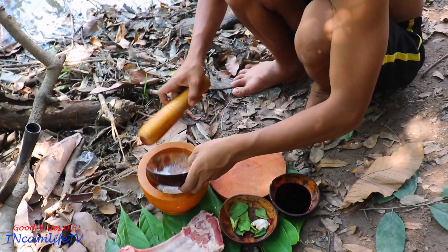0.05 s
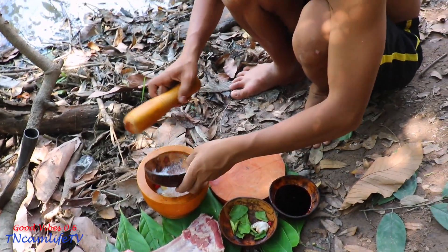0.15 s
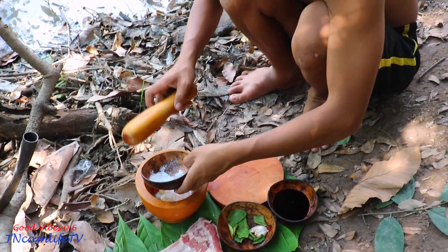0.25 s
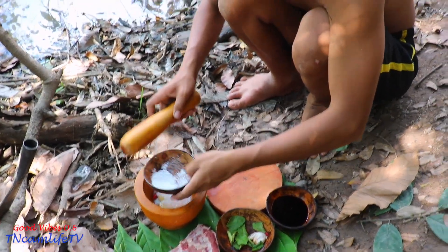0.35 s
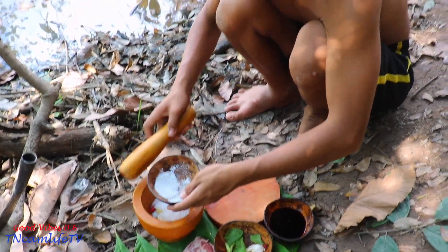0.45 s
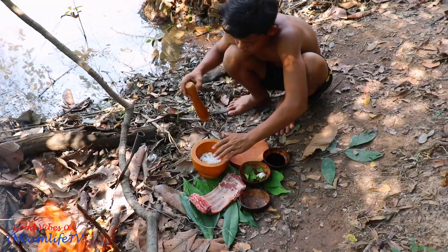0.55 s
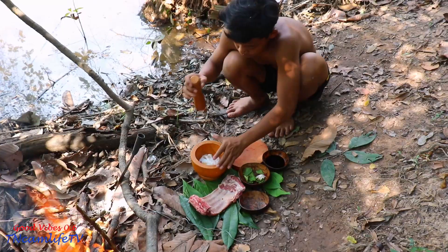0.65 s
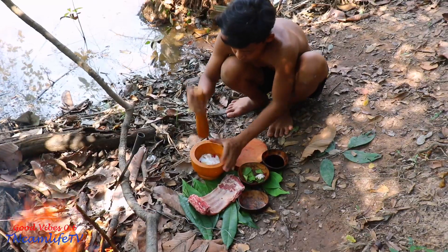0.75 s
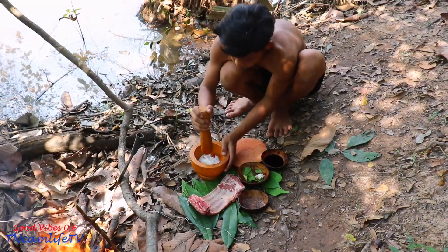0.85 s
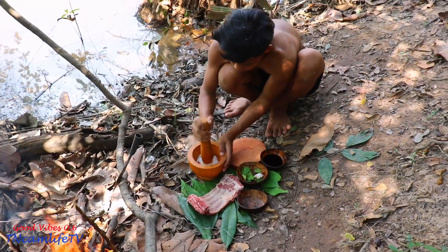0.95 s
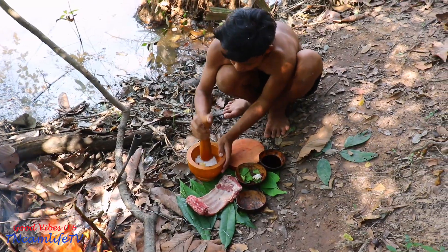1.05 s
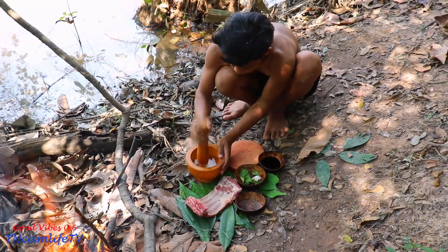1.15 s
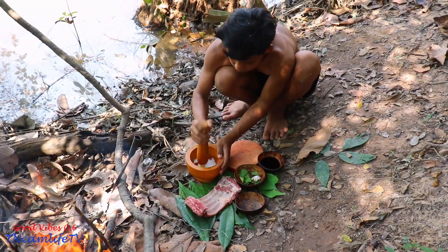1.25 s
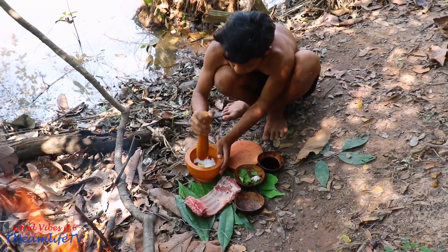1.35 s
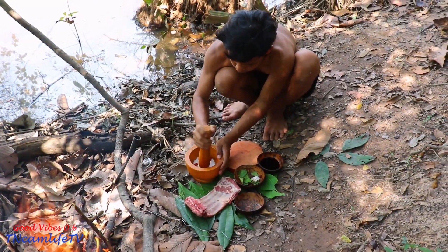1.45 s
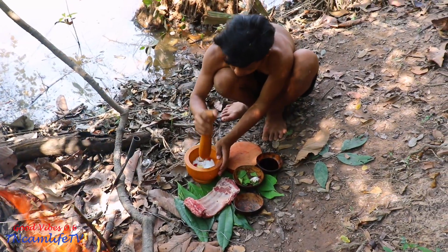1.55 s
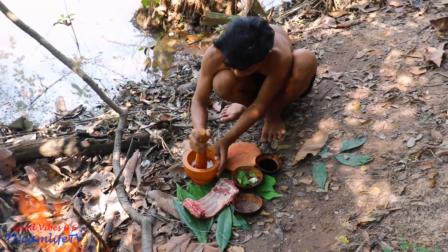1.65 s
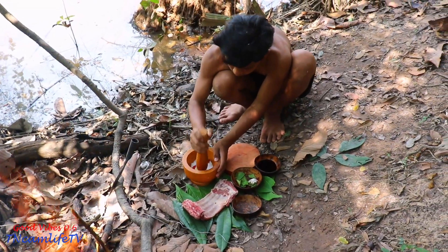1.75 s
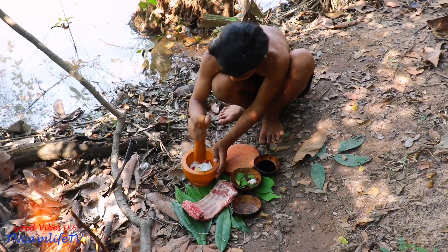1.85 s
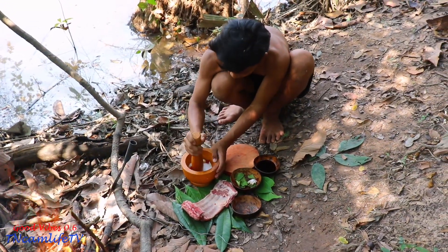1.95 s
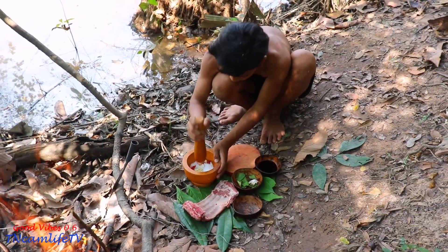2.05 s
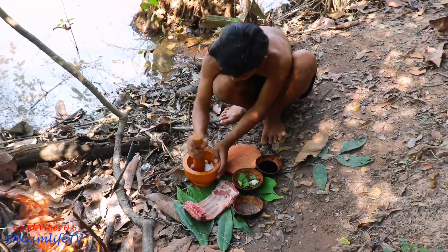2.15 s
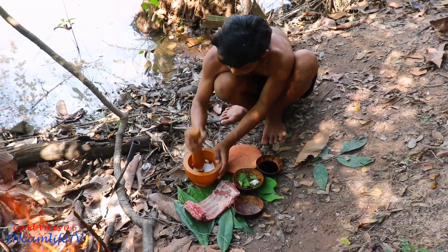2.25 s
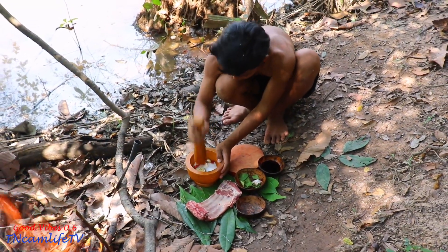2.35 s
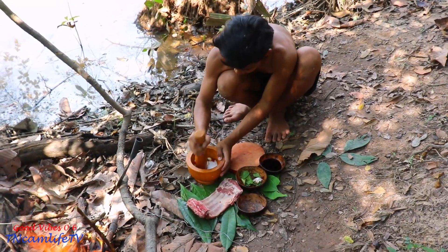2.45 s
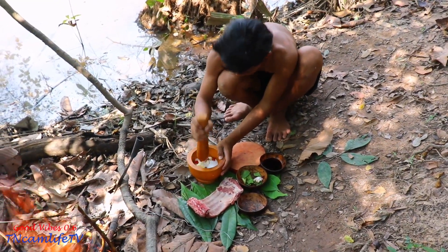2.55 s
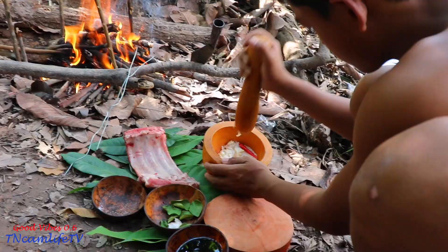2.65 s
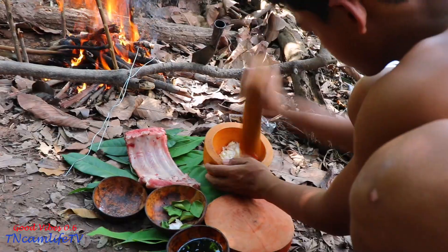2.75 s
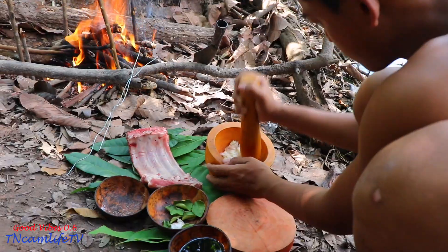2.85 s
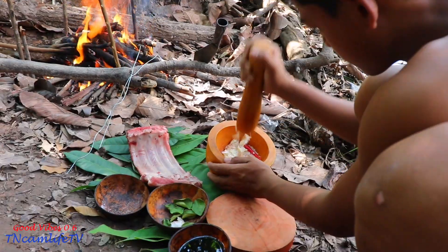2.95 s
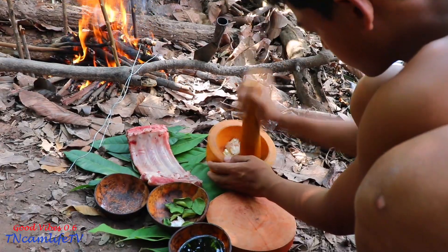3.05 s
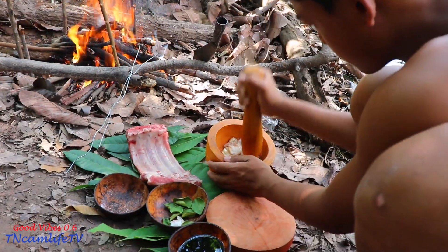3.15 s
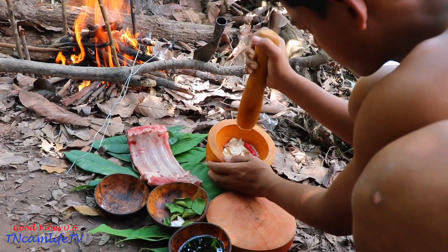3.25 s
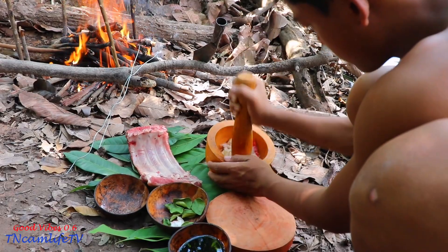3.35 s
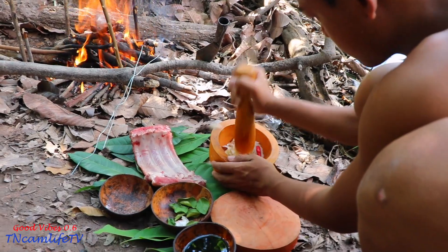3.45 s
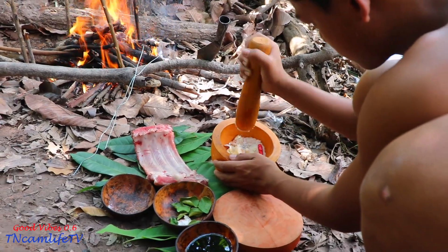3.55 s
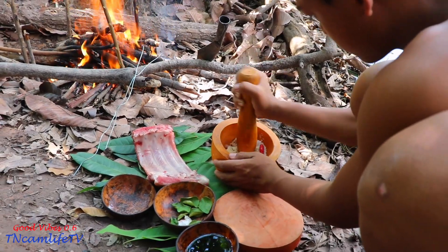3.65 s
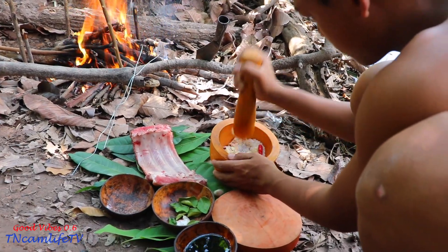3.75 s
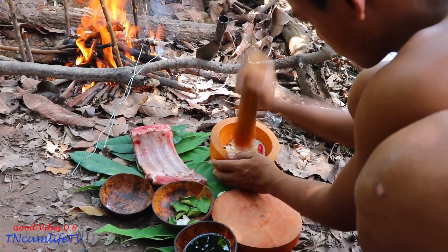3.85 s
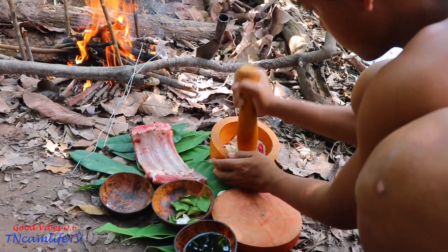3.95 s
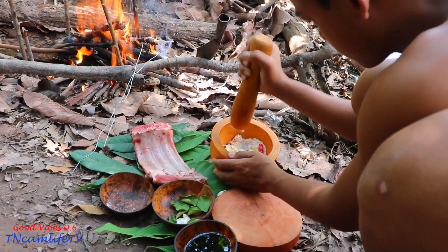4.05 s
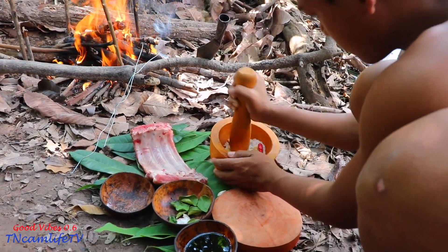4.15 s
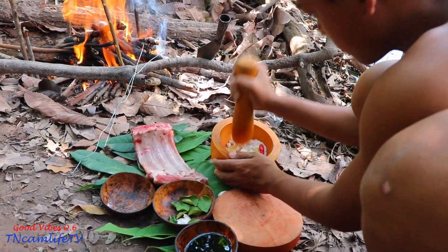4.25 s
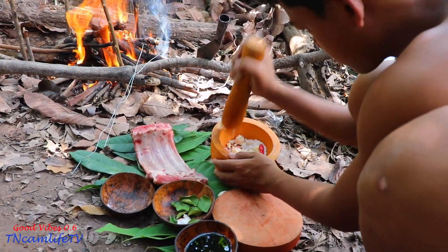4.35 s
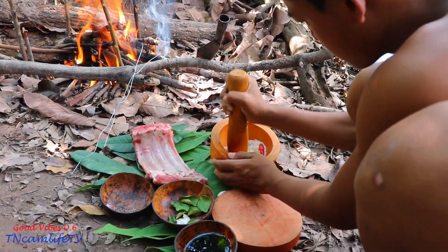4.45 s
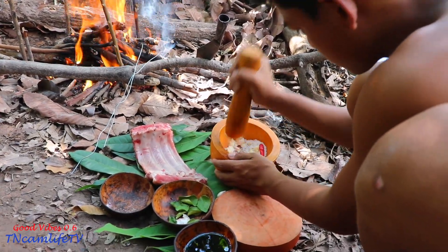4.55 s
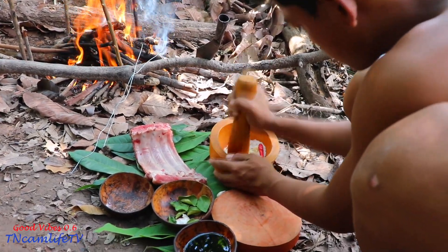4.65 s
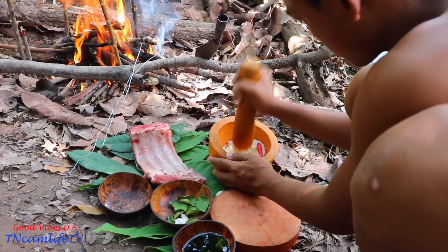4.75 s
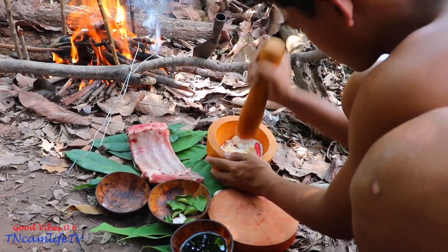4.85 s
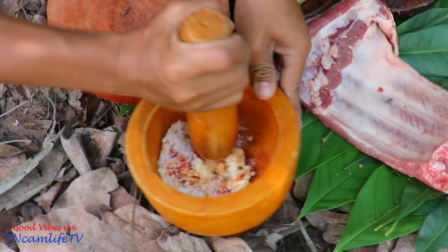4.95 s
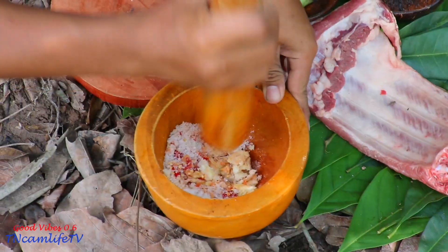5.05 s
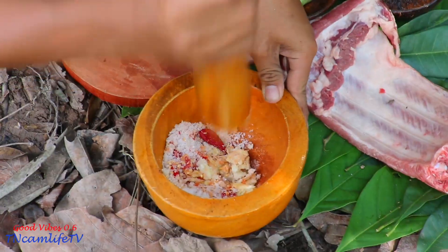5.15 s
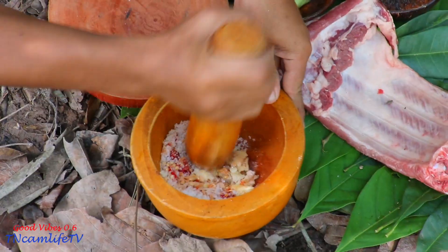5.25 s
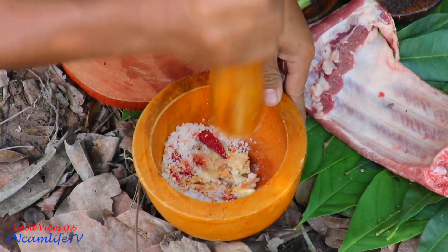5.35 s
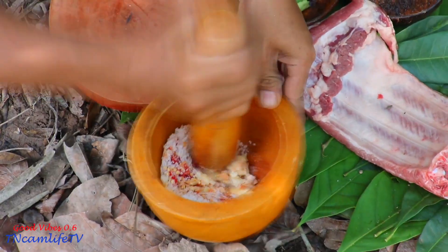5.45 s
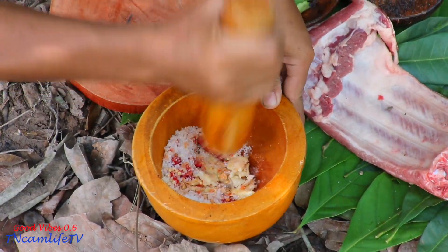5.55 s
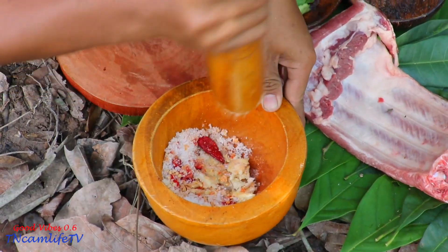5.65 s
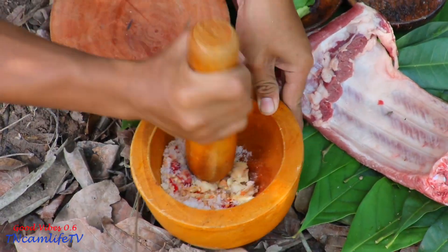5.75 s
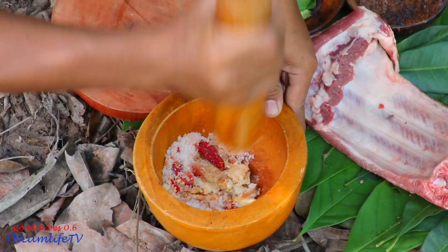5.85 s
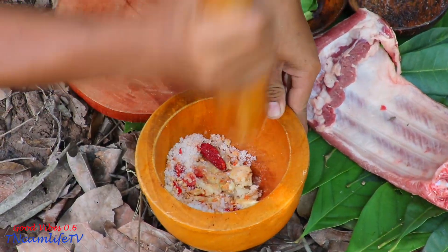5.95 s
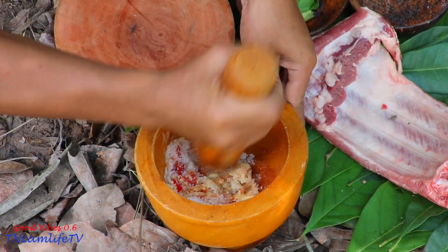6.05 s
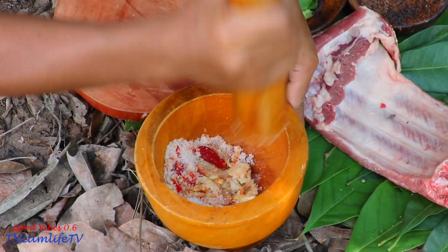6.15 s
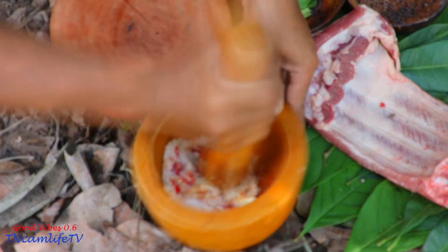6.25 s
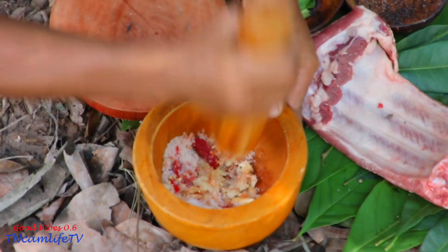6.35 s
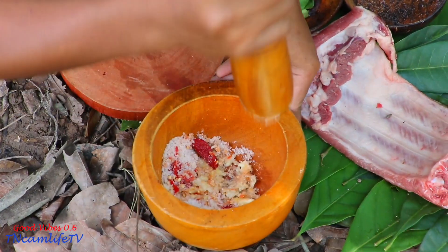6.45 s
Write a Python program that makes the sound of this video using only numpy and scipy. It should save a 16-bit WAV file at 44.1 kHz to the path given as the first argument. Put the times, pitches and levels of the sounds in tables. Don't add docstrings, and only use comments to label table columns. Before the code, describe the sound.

Dry, short knocks of wood on wood, each wrapped in a bright crunch of breaking grains, repeat at a steady hand-pounding pace. The microphone placement changes three times through tiny gaps: quiet opening, mid-distance crunching with faint high whistles, thumpier uneven pounding near a rumbling fire, then close heavy blows with paste rustling between. Open-air, almost no echo, slightly left, gain dipping after the loudest hits.

```python
import sys
import numpy as np
from scipy import signal
from scipy.io import wavfile
from scipy.ndimage import uniform_filter1d, map_coordinates

SR = 44100
rng = np.random.default_rng(int(sys.argv[2]) if len(sys.argv) > 2 else 0)


def how_loud(loudness_db):
    steps = np.asarray(loudness_db, float) / 20
    return 10 ** steps


def wrap_up_sound(samples):
    columns = np.atleast_2d(samples).T
    tamed = np.clip(columns, -1, 1)
    steps = np.round(tamed * 32767).astype(np.int16)
    wavfile.write(sys.argv[1], SR, steps)


N = 286621
LEAD_IN = 1800


def unit(x):
    return x / np.sqrt(np.mean(x ** 2) + 1e-20)


def at_hz(points, hz):
    points = np.array(points)
    return np.interp(np.log(hz), np.log(points[:, 0]), points[:, 1])


def drift(rate):
    knots = rng.standard_normal(int(7 * rate) + 9)
    return map_coordinates(knots, [np.arange(N) / SR * rate + 2], order=3)


def ring(x, hz, t60):
    r = how_loud(-60 / (t60 * SR))
    w = 2 * np.pi * hz / SR
    return signal.lfilter([0, np.sin(w)], [1, -2 * r * np.cos(w), r * r], x)


def band(x, low_hz, high_hz):
    edges = [low_hz, min(high_hz, .45 * SR)]
    return signal.sosfilt(signal.butter(2, edges, "band", fs=SR, output="sos"), x)


def add(out, sound, at, pan_db):
    part = (sound * how_loud(np.array([[pan_db / 2], [-pan_db / 2]])))[:, :N - at]
    out[:, at:at + part.shape[1]] += part


def shot_at(t):
    # (start [s], bowl pitch [Hz], ground thud [dB], fire rumble [dB], crush treble [dB])
    placements = [
        (0, 1077, -57, -54.5, -0.5),
        (.525, 903, -36, -57, -3.5),
        (2.658, 900, -30.5, -53, -2),
        (4.92, 918, -53, -54.5, -5),
    ]
    rows = np.array(placements)
    return rows[np.searchsorted(rows[1:, 0], t), 1:].T


def airy(spectrum, patchy_db):
    # (frequency [Hz], left-right likeness [0-1])
    port_likeness = [(60, 0.79), (130, 0.43), (300, 0.4), (700, 0.013), (15000, .01)]
    # (frequency [Hz], left minus right [dB])
    port_lean = [(60, -4), (150, -8), (380, -2), (950, -3), (2380, -5), (5980, -4), (15000, -3)]
    out = 0
    shared = drift(3.0)
    edges = 20 * 2 ** np.arange(0, 10.5, .5)
    white = rng.standard_normal((2, 2, N))
    for k, (low, high) in enumerate(zip(edges, edges[1:])):
        hz = np.sqrt(low * high)
        if not spectrum[0][0] < hz < spectrum[-1][0]:
            continue
        mid, side = band(white[k % 2], low, high)
        alike = np.clip(at_hz(port_likeness, hz), 0, 1)
        lean = at_hz(port_lean, hz) / 2
        gain = how_loud(at_hz(spectrum, hz) + patchy_db * (0.077 * shared + drift(14)))
        stereo = np.sqrt(1 + alike) * mid + np.sqrt(1 - alike) * side * [[1], [-1]]
        out = out + gain * how_loud(np.array([[lean], [-lean]])) * stereo
    return out / np.sqrt(np.mean(out.mean(0) ** 2))


def forest_hiss(t):
    # (frequency [Hz], density [dB per Hz])
    hiss_spectrum = [(1500, -8), (3000, -1), (5000, 4.5), (8000, 0.5), (11000, 11.5), (13000, -13),
                     (18000, 1)]
    # (time [s], level [dB])
    hiss_level = [(0, -60), (.51, -62), (.54, -59), (2.65, -64), (2.67, -63), (4.91, -62), (4.93, -62),
                  (5.9, -58), (6.5, -55)]
    return how_loud(np.interp(t, *np.transpose(hiss_level))) * airy(hiss_spectrum, patchy_db=.3)


def fire_rumble(t):
    # (frequency [Hz], density [dB per Hz])
    rumble_spectrum = [(12, -53), (20, -24), (59, -2.5), (120, 0), (313, -5), (386, -13), (700, -12),
                       (1000, -27)]
    return how_loud(shot_at(t)[2]) * airy(rumble_spectrum, patchy_db=2.6)


def rustle(t):
    # (frequency [Hz], density [dB per Hz])
    rustle_spectrum = [(300, -7.5), (600, -15), (1000, -11), (1500, -13.5), (2300, -13.5), (3500, -16),
                       (5500, -26.5), (9000, -23)]
    # (time [s], level [dB])
    stirring = [(0, -60.5), (1.39, -60.5), (1.77, -58.5), (2.03, -62.5), (2.51, -60), (2.71, -61),
                (3.17, -57.5), (3.53, -59), (3.96, -57), (4.29, -61.5), (4.85, -61), (5.0, -55),
                (5.5, -52.5), (5.61, -45.5), (5.76, -55), (5.88, -47), (6.01, -54), (6.5, -48)]
    return how_loud(np.interp(t, *np.transpose(stirring))) * airy(rustle_spectrum, patchy_db=.4)


def birds():
    # (start [s], length [s], start pitch [Hz], end pitch [Hz], level [dB])
    glides = [(0.532, 0.1, 2160, 2200, -58), (0.672, .03, 2340, 2370, -61.5),
              (1.193, 0.017, 3800, 3670, -57), (1.392, 0.068, 3640, 3540, -56.5),
              (1.596, 0.028, 3800, 3640, -52.5), (1.636, 0.084, 3660, 3730, -54),
              (1.753, 0.092, 3930, 3700, -52.5), (1.632, 0.069, 1242, 1296, -55),
              (1.652, 0.055, 2600, 2400, -53.5), (1.869, .05, 3700, 3560, -65),
              (2.065, .045, 3650, 3750, -62), (2.194, 0.04, 3800, 3800, -59),
              (2.97, 0.03, 1306, 1285, -54.5), (2.408, 0.1, 3750, 3510, -57.5),
              (2.618, 0.028, 3700, 3490, -57), (5.447, 0.1, 6530, 5240, -56.5),
              (5.58, 0.084, 5760, 6800, -51.5), (3.147, 0.018, 1435, 1420, -38),
              (6.416, 0.072, 6670, 5300, -49.5)]
    out = np.zeros((2, N))
    for s, length, from_hz, to_hz, db in glides:
        size = int(length * SR)
        turns = np.cumsum(np.linspace(from_hz, to_hz, size)) / SR
        flutter = signal.lfilter([1], [1, -.95], rng.standard_normal((2, size)))
        husk = .85 + 1.3 * unit(flutter)
        whistle = husk * np.hanning(size) ** 0.1 * np.sin(2 * np.pi * turns)
        add(out, how_loud(db) * whistle, round(s * SR), -7.0)
    return out


def grit(size, spread_db, unlike):
    both = rng.standard_normal(size)
    own = rng.standard_normal((2, size))
    return unit((both + unlike * own) * how_loud(spread_db * rng.exponential(1, size)))


def brittle(x, hz, treble_db, t60):
    body = unit(band(x, 1100, 4760)) + 1.19 * unit(ring(x, hz, t60))
    return unit(body) + how_loud(treble_db - 3.0) * unit(band(x, 3200, 9630))


def ticks():
    # (time [s], peak level [dB], ring [Hz], treble [dB])
    snaps = [(0.215, -32.5, 2400, 5), (0.3132, -39, 9200, 8), (0.4193, -39, 2290, 7),
             (0.4878, -38.5, 2890, 4), (1.0152, -22, 3100, 0.5), (1.1627, -26, 2840, -8),
             (1.934, -25.5, 3200, -22), (2.671, -40, 1880, -2), (3.031, -42, 2680, 6),
             (3.3213, -36, 2070, 4), (3.389, -36, 2900, 12), (3.5196, -41, 2750, 6), (3.6, -32, 3700, -2.5),
             (3.6796, -36, 8820, 5), (3.7647, -19, 2230, -12), (3.8109, -24, 2270, -27),
             (3.8252, -24, 2070, -10), (3.862, -40, 2190, 5), (3.903, -34.5, 9200, 0),
             (4.0583, -27.5, 1900, -10), (4.4203, -35.5, 7350, 4), (4.5958, -33.5, 2030, 5),
             (4.6443, -31.5, 3030, 3), (4.7035, -30.5, 7300, 10), (4.7877, -24, 1750, -11),
             (5.163, -33, 1710, 3), (5.503, -31.5, 5650, 15), (5.689, -30, 2210, 1),
             (5.876, -28, 1750, -17), (6.273, -30, 4160, 2)]
    out = np.zeros((2, N))
    t = np.arange(2000) / SR
    for s, peak_db, hz, treble_db in snaps:
        t60_ms = 12.6 + 0.14 * treble_db
        snap = brittle(grit(len(t), spread_db=2.0, unlike=1.0), hz, treble_db, 0.028)
        snap = snap * how_loud(-60000 * t / max(t60_ms, 2))
        add(out, how_loud(peak_db) * snap / np.abs(snap).max(), round(s * SR), -6.5)
    return out


def ground_thud(tap):
    thud = band(ring(np.roll(tap, -70), 136.5, 0.067) + 2.5 * ring(tap, 267, 0.04), 75, 370)
    return np.array([thud, thud]) / np.abs(thud).max()


def pestle_ring(push, hz):
    pestle = ring(np.roll(push, -40), hz, .024) + .6 * ring(np.roll(push, 90), hz * 1.07, .03)
    return pestle / np.abs(pestle).max()


def bowl_knock(push, clean, bowl_hz, pulse_hz, ring_db):
    # (multiple of bowl pitch [ratio], level [dB], t60 [s])
    bowl_modes = [
        (.95, 0, .04),
        (1.3, -5, .025),
        (3.15, -7, .018),
        (4.6, -9, .012),
    ]
    cycles = np.arange(-130, 131) / SR * pulse_hz
    envelope = np.exp(-np.where(cycles < 0, (cycles / .72) ** 4, (cycles / .8) ** 2))
    pulse = np.convolve(push, -np.cos(2 * np.pi * cycles + .5) * envelope, "same")
    modes = 0
    for k, db, t60 in bowl_modes:
        level = how_loud(db + rng.normal(0, 2.7))
        modes = modes + level * ring(push, bowl_hz * k * rng.normal(1, 0.023), t60)
    if not clean:
        modes = modes / np.abs(modes).max()
    return pulse / np.abs(pulse).max() + how_loud(ring_db) * modes


def contact_force(late, rise, fall, clean):
    away = np.where(late < 0, -late / max(rise, .2), late / max(fall, .5))
    if clean:
        return np.exp(-away) + 1.2 * np.exp(-np.abs(late) / 0.08)
    return np.exp(-away ** 1.7 / 2.21)


def pounding(blows, clean, rise_share, pulse_share, bright_db):
    out = np.zeros((2, N))
    ms = np.arange(-LEAD_IN, 6000) / SR * 1000
    tap = 1. * (np.arange(len(ms)) == LEAD_IN + 75)
    lead = clean * np.exp(np.minimum(ms, 0) / 9) * (ms < 0)
    settle = np.exp(-ms / 32) * (ms > 0)
    for s, peak_db, knock_db, hz, fall in blows:
        at = round(s * SR) - LEAD_IN
        bowl_hz, thud_db, _, treble_db = shot_at(s)
        treble_db += bright_db - 0.29 * (peak_db + 26.5)
        thud_db += 0.87 * (min(knock_db, -32.5) + 41.5) + (0 if clean else -2)
        settle_db = peak_db - 47.5 + 13.5 * np.log(max(fall, .5))
        ring_db = (-3 if clean else -6) - .45 * (max(knock_db, -45) + 35)
        pulse_hz = how_loud(0.15 * (peak_db + 9.0)) * bowl_hz * pulse_share

        force = contact_force(ms - .6 * clean, fall * rise_share, fall, clean)
        grains = grit(len(ms), spread_db=2.5, unlike=1.0)
        push = tap if clean else grains.mean(0) * force
        crunch = brittle(grains, hz, treble_db, 0.00065) * force
        crunch += how_loud(-18.5) * unit(ring(grains, hz, 0.00093)) * lead
        crunch *= how_loud(peak_db - 8.5)
        crunch += how_loud(settle_db) * brittle(grains[:, ::-1], hz, -6.5, 0.0005) * settle

        knock = bowl_knock(push, clean, bowl_hz, pulse_hz, ring_db)
        crunch += how_loud(peak_db - 13.0) * pestle_ring(push, hz)
        rocking = how_loud(-31) * lead + how_loud(-18.5) * np.exp(-ms / 9) * (ms > 3.0)
        shake = unit(ring(grains, bowl_hz, 8 / bowl_hz)) * rocking
        wood = band(knock + shake, 103, 22000)
        wood = np.array([np.roll(wood[0], 3), wood[1]])

        add(out, crunch, at, -8.5)
        add(out, how_loud(knock_db + 8.0) * wood, at, -4.0)
        add(out, how_loud(thud_db - 1.0) * ground_thud(tap), at, -6.0)
    return out


def cushioned_blows():
    # (time [s], grain crush [dB], wood knock [dB], pestle ring [Hz], crush fall [ms])
    squashes = [(.765, -50.5, -70, 2690, 33), (1.042, -28.5, -54, 3050, 9.3), (1.68, -63.5, -53, 2700, 3),
                (3.222, -27, -43.5, 2710, 2.8), (3.435, -18.5, -40.5, 3140, 8.3),
                (3.655, -53, -51, 800, 6.2), (3.717, -19.5, -37.5, 2590, 8.7),
                (4.208, -29.5, -50, 3030, 2.1), (4.502, -25.5, -37.5, 3080, 9.9),
                (4.545, -40.5, -73, 2940, 9.5), (4.795, -36, -46, 3000, 1.2),
                (4.945, -38.5, -57, 2860, 9.3), (4.98, -41, -56, 2950, 10), (5.026, -13.5, -17, 3240, 6.3),
                (6.15, -33.5, -47, 2460, 14.5)]
    return pounding(squashes, False, rise_share=1, pulse_share=1.03, bright_db=3.5)


def ploughing_blows():
    # (time [s], grain crush [dB], wood knock [dB], pestle ring [Hz], crush fall [ms])
    ploughs = [
        (1.2725, -23, -74, 2630, 6.7),
        (1.4622, -21.5, -35, 2750, 1.9),
        (2.4917, -15.5, -27.5, 2836, 8),
        (4.2234, -16.5, -36.5, 1730, 6.4),
        (4.7557, -18.5, -47, 1980, 7.4),
        (6.359, -7, -14, 2830, 7),
    ]
    return pounding(ploughs, True, rise_share=0.47, pulse_share=0.68, bright_db=4.5)


def clean_blows():
    # (time [s], grain crush [dB], wood knock [dB], pestle ring [Hz], crush fall [ms])
    cracks = [(0.1089, -31.5, -49.5, 1920, 8.4), (1.265, -25, -41, 1850, 4.9),
              (1.498, -19.5, -47.5, 2920, 7.6), (1.7443, -11.5, -40.5, 3420, 6),
              (1.9904, -12, -41.5, 3370, 7), (2.2377, -12.5, -26, 4760, 6.8),
              (2.8717, -12.5, -35.5, 4100, 9.7), (3.1573, -8, -11.5, 2600, 4.7),
              (3.9697, -10, -29, 4660, 4), (5.2928, -8, -12, 2170, 3), (5.5569, -5.5, -8.5, 2320, 1.7),
              (5.8185, -12.5, -9, 2440, 1.1), (6.0888, -1, -11, 2110, 1.7)]
    return pounding(cracks, True, rise_share=0.083, pulse_share=0.91, bright_db=0)


def scene():
    t = np.arange(N) / SR
    near = forest_hiss(t) + fire_rumble(t) + rustle(t)
    near += cushioned_blows() + ploughing_blows() + clean_blows()
    near = signal.sosfilt(signal.cheby2(14, 50, 16100, fs=SR, output="sos"), near)
    return near + birds() + ticks()


def band_limit(x):
    return signal.sosfilt(signal.butter(12, 16850, fs=SR, output="sos"), x)


def record(dry):
    # (start [s], end [s], gain [dB], fade out [s], fade in [s])
    mutes = [
        (.521, .536, -42, .012, .0005),
        (.56, .562, -18, .002, .008),
        (2.656, 2.668, -42, .012, .001),
        (2.694, 2.696, -22, .002, .01),
        (4.918, 4.926, -42, .008, .0005),
        (4.96, 4.963, -45, .002, .007),
    ]
    t = np.arange(N) / SR
    power = np.abs(uniform_filter1d((dry ** 2).max(0), size=600, origin=299))
    over_db = 0.5 * np.maximum(10 * np.log10(power + 1e-12) + 31, 0)
    held_db = np.maximum(np.maximum.accumulate(over_db + 60 * t) - 60 * t, 0)
    gain_db = -signal.lfilter([.004], [1, -.996], held_db)
    for start, end, db, out_s, in_s in mutes:
        gain_db = gain_db + np.interp(t, [start - out_s, start, end, end + in_s], [0, db, db, 0])
    mix = 1.183 * np.tanh(dry * how_loud(gain_db) / 1.12)
    return band_limit(mix)


dry = scene()
out = record(dry)
wrap_up_sound(out)
```